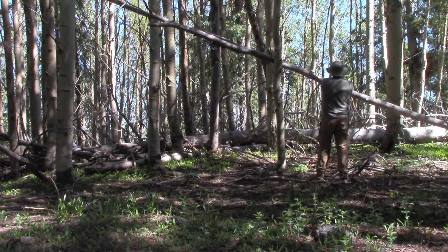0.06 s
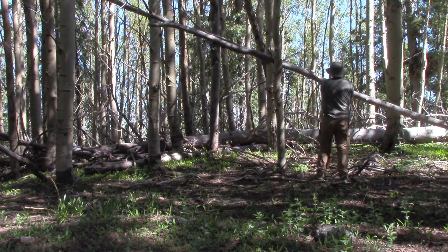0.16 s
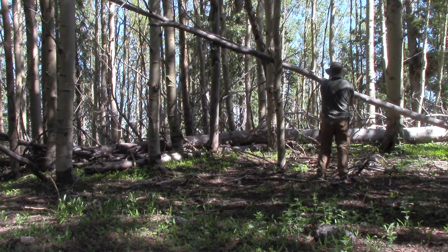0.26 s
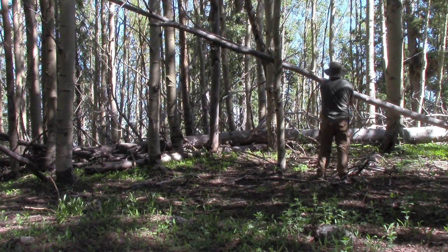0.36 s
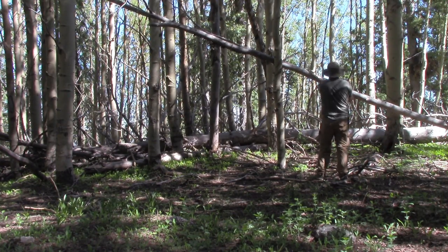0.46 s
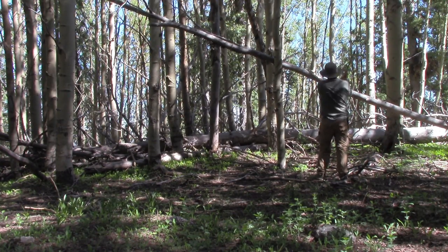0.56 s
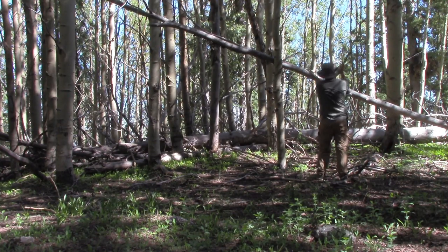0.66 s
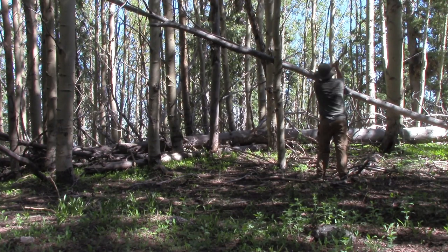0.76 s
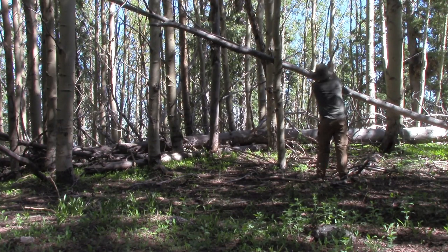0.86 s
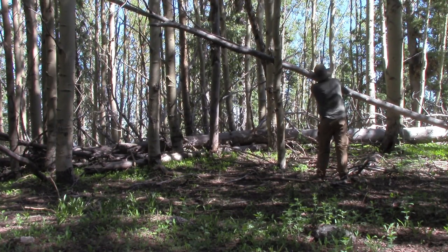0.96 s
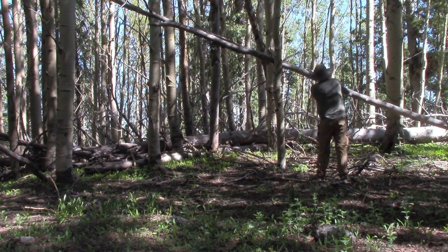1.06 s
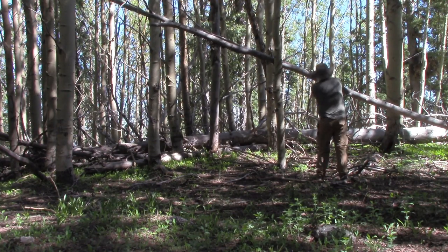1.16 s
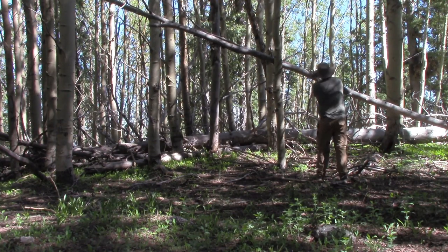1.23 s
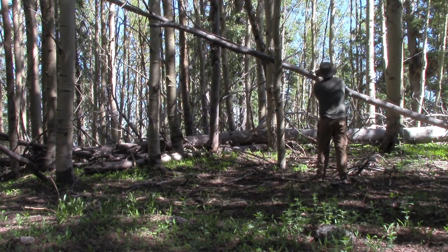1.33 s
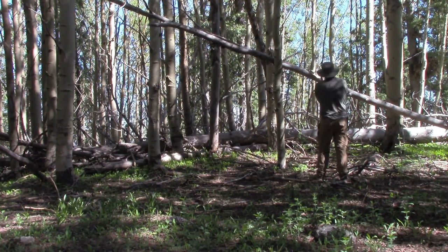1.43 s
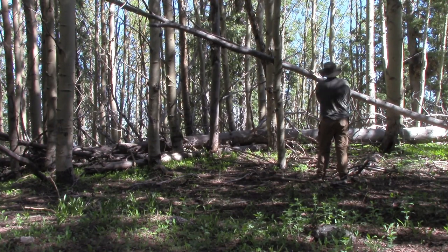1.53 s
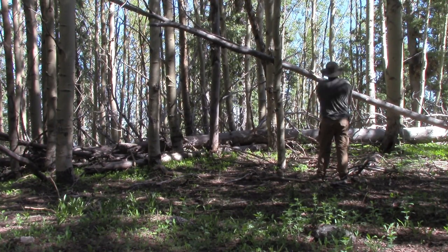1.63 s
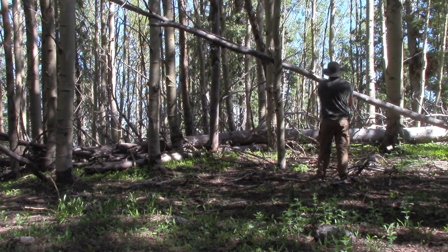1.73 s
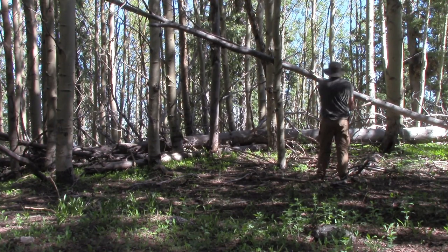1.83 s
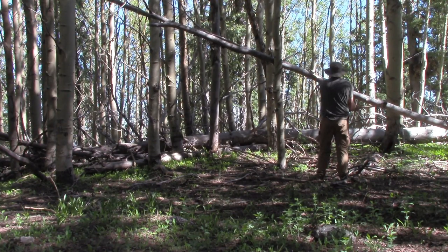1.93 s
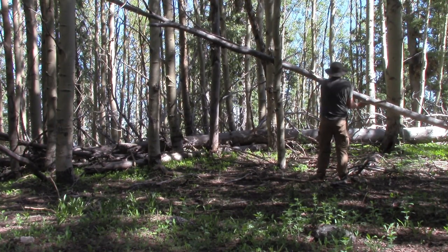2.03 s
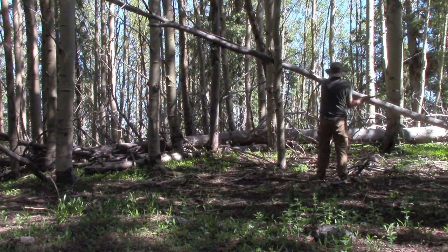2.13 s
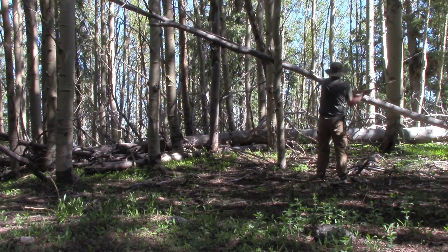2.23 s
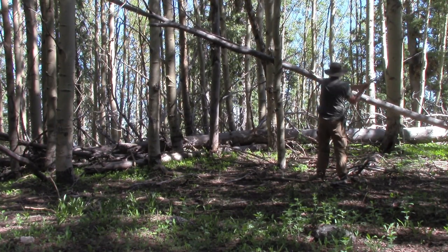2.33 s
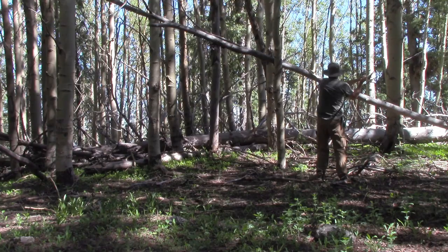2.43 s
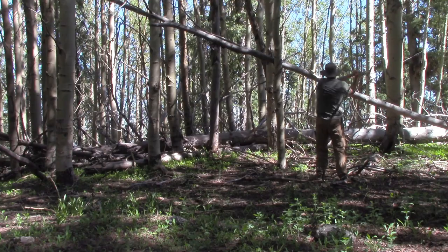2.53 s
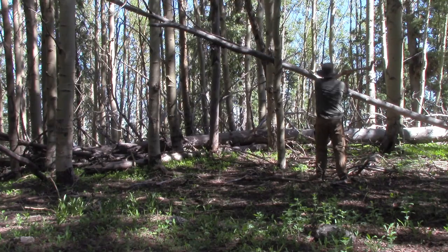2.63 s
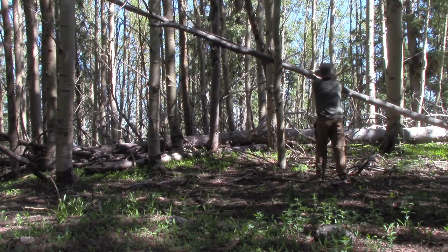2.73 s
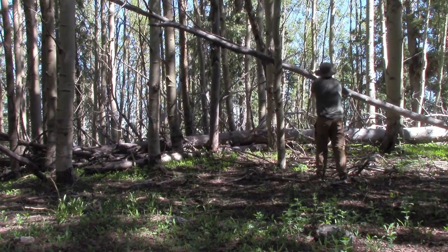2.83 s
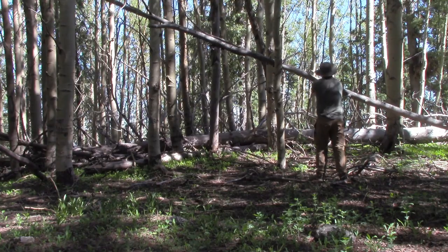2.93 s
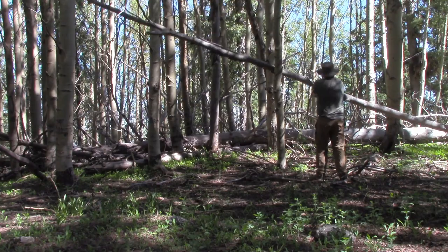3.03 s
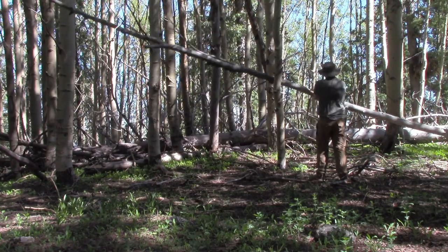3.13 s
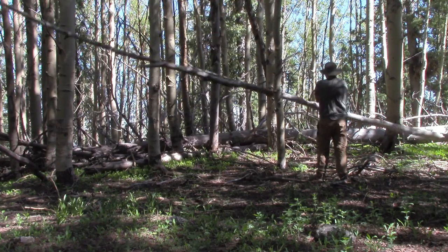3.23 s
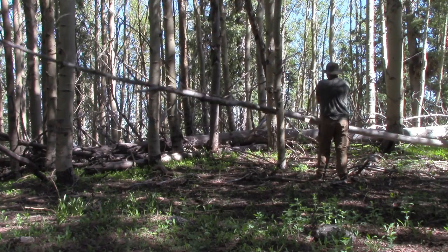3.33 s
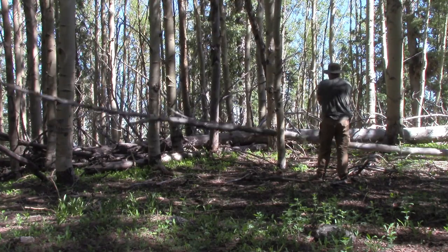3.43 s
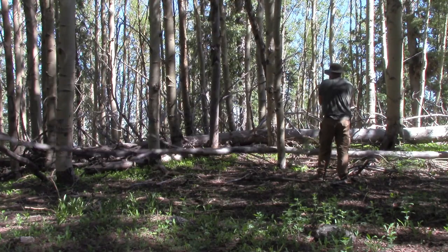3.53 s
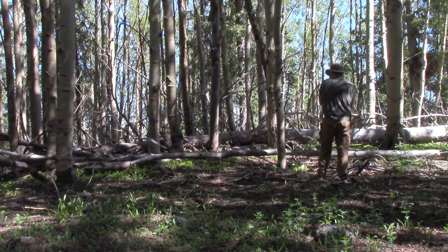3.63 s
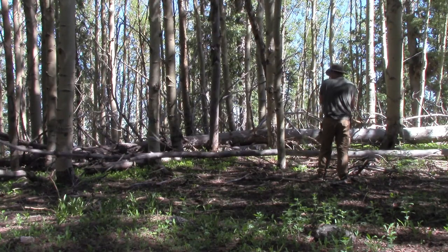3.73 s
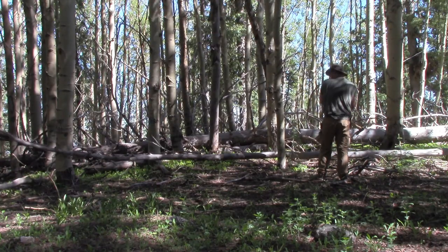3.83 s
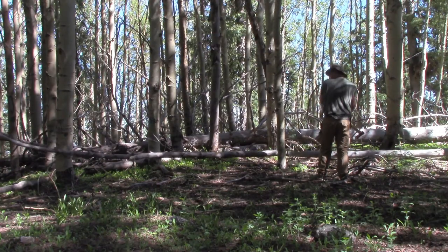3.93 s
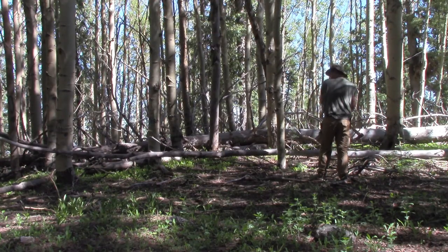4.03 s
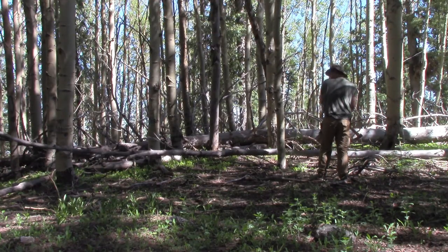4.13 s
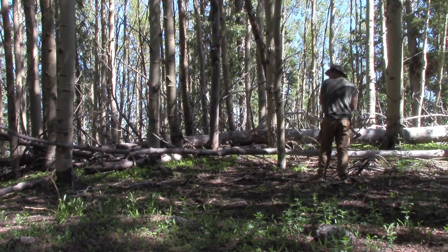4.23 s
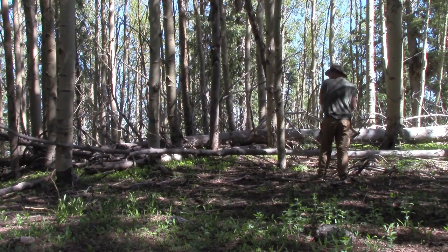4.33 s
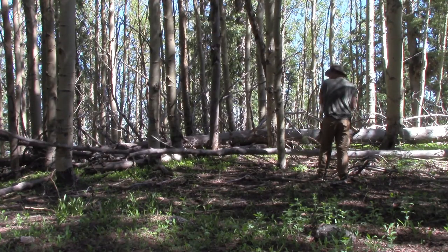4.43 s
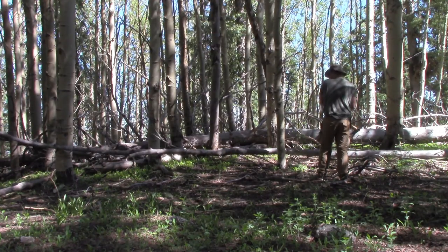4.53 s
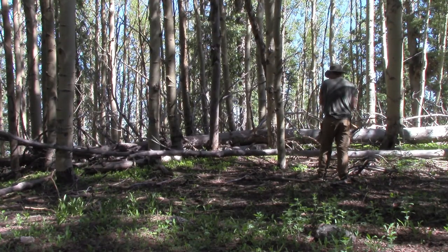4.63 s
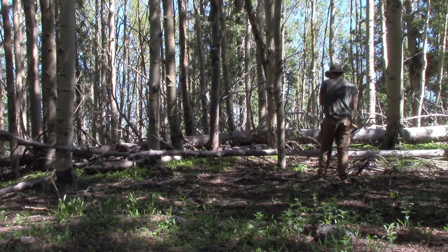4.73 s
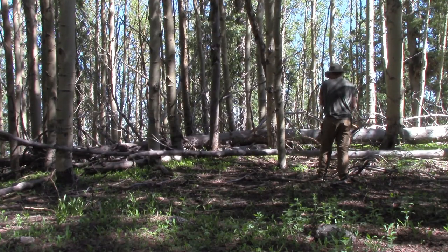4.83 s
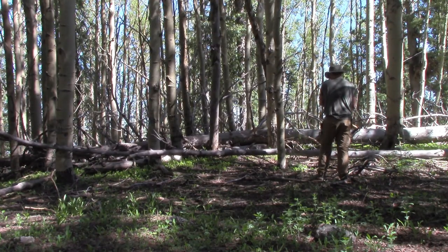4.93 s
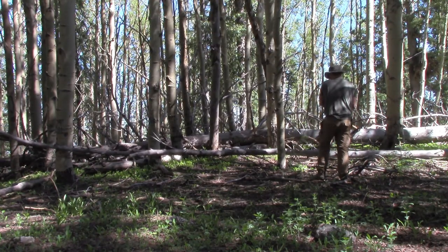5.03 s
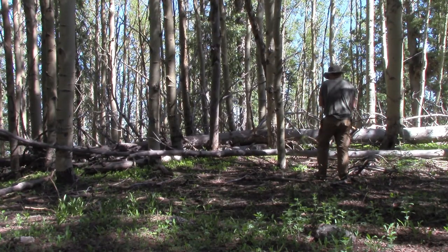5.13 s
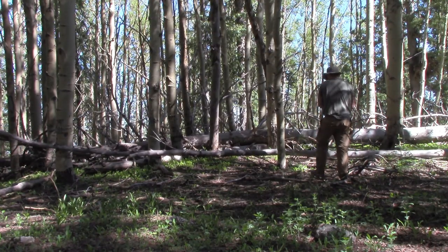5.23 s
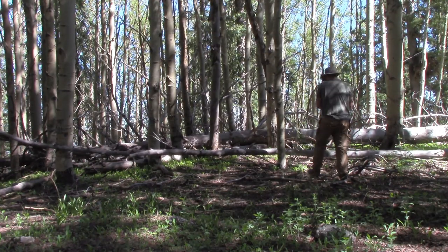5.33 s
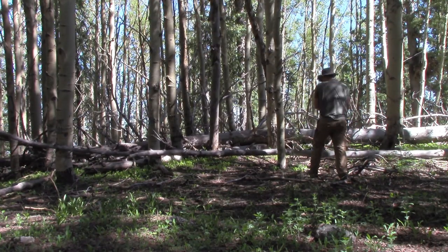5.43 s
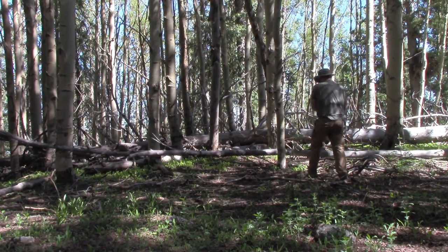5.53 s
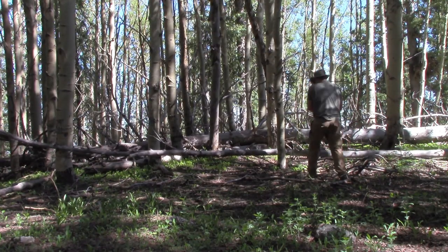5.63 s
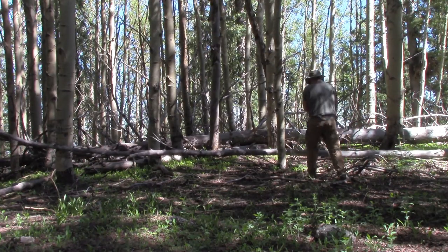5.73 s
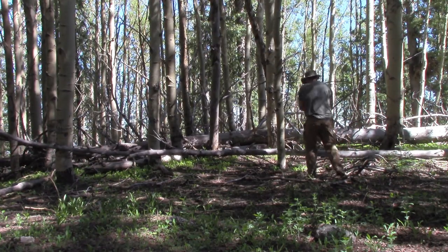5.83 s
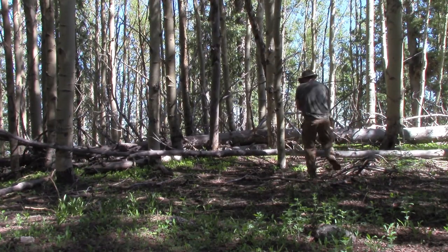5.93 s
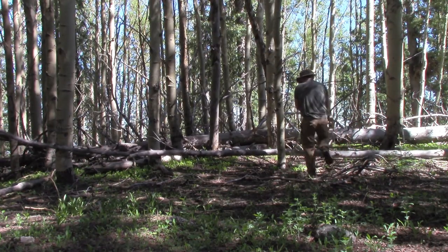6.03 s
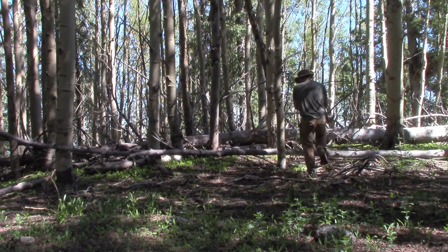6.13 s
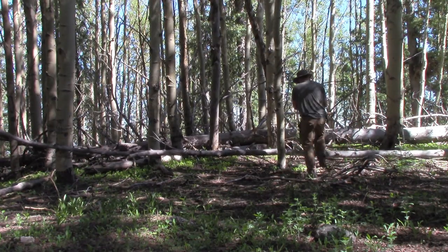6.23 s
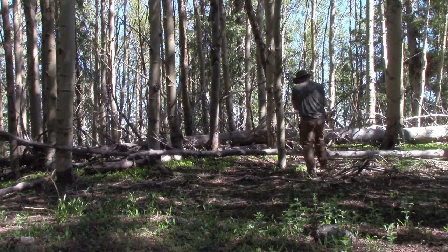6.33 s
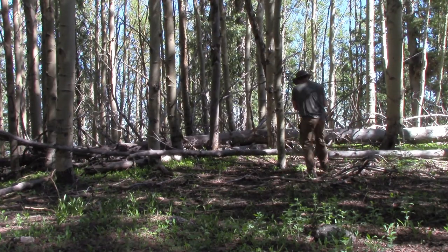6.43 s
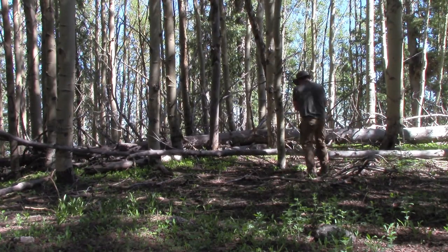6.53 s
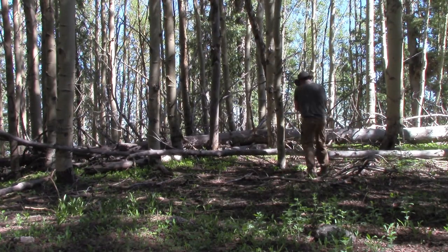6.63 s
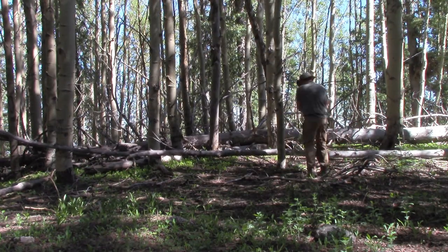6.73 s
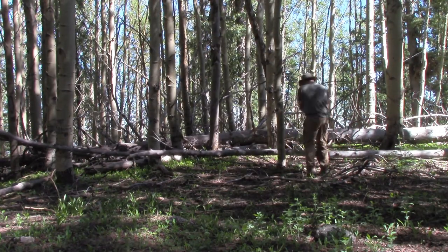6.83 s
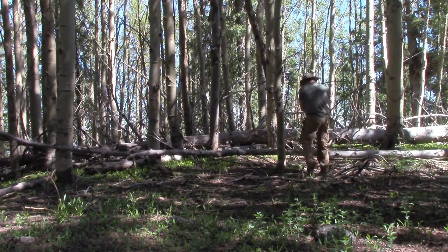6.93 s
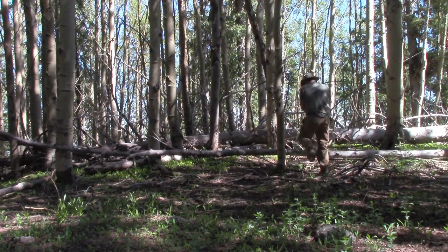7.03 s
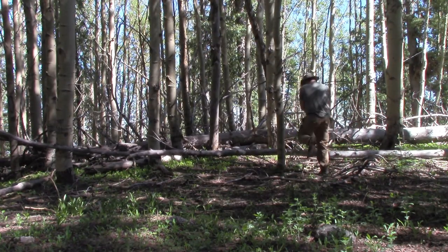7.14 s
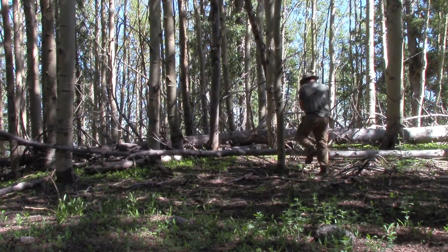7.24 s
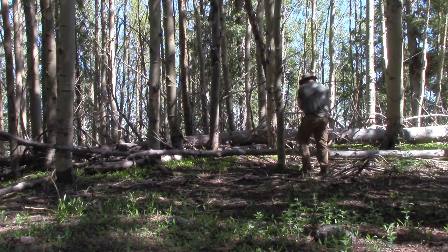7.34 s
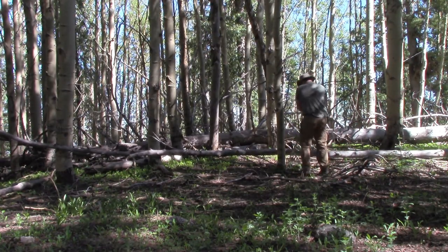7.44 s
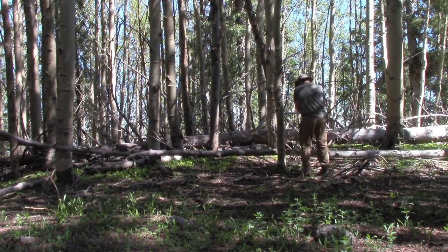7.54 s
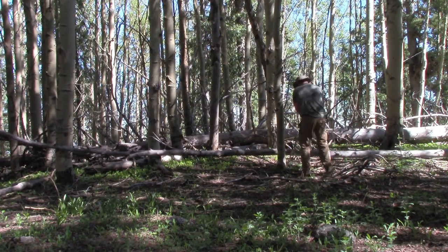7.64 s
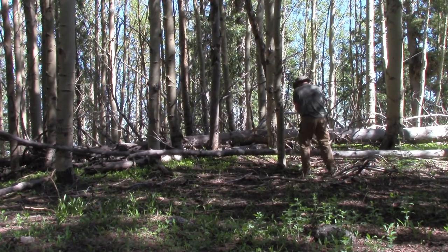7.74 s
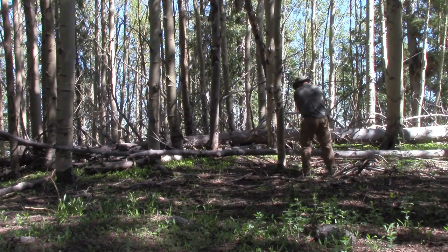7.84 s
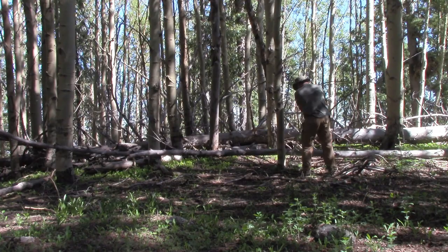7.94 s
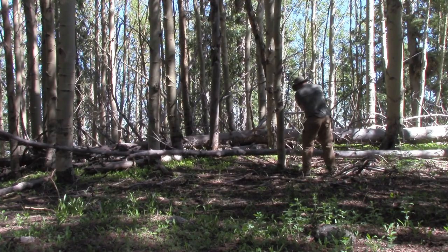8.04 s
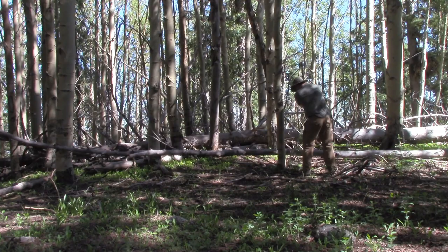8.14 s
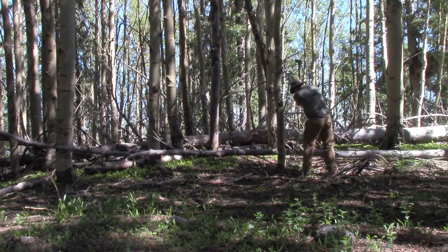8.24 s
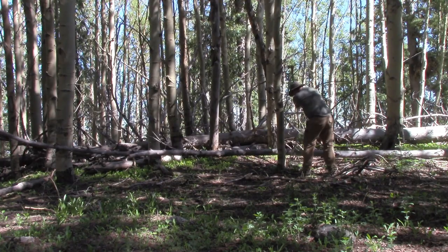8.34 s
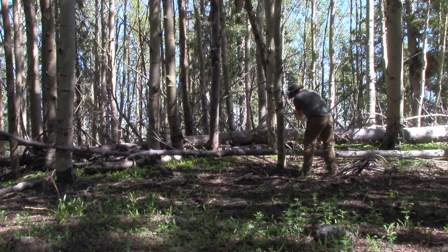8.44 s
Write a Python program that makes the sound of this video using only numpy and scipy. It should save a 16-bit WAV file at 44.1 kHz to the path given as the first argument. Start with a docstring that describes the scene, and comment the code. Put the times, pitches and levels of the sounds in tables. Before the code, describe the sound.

In a forest with a faint breeze and ticking twigs, an axe strikes a dead leaning tree twice, each blow a woody crack with a short echo. After the second, the tree crashes through dry branches that snap and splinter, and thumps onto the ground. Debris patters down, then boots shuffle softly over leaf litter and break a few sticks. A faint bird trills at the end. Everything is heard from several metres away.

```python
"""A forest in a light breeze, twigs ticking. Some metres away an axe strikes a dead leaning tree twice,
splitting fibres and ringing the trunk. The tree gives way and crashes down through dry branches, which
snap and splinter; it thumps onto the ground and needles hiss down after it. Then boots shuffle over leaf
litter and break a few sticks. The standing trunks scatter every blow back; a far bird trills at the end."""
import sys
import numpy as np
from scipy import signal
from scipy.fft import rfft, irfft, next_fast_len
from scipy.io import wavfile
from scipy.ndimage import map_coordinates

SR = 44100
rng = np.random.default_rng(int(sys.argv[2]) if len(sys.argv) > 2 else 0)


def inscribe(sig):
    """Save sig as 16-bit PCM at rate SR to the path in sys.argv[1].

    A 1-D sig is mono; a 2-D sig holds one channel per row.
    Samples are clipped to [-1, 1] before scaling.
    """
    pcm = np.round(np.clip(np.atleast_2d(sig).T, -1, 1) * 32767)
    wavfile.write(sys.argv[1], SR, pcm.astype(np.int16))


N = 373527
T = np.arange(SR // 5) / SR  # time since a hit, s

# Cue levels are faders, ahead of each layer's own trim.
# axe blows: t/s, level/dB, splitting crack/dB, sub-bass pulse/dB
AXE_BLOWS = [(1.0328, -13.5, -4.5, -33), (2.8396, -12, -2.5, -16)]
# twigs ticking: t/s, level/dB, f/Hz
TWIG_TICKS = [(0.124, -26.5, 8400), (0.229, -20, 2600), (0.307, -26.5, 8610), (0.424, -30.5, 7000),
              (0.601, -32, 8160), (0.687, -21.5, 8000), (1.6046, -27, 3080), (1.832, -25.5, 1640),
              (2.15, -33, 2880), (4.782, -16.5, 2760), (4.9313, -22.5, 2080), (4.9581, -19.5, 2930),
              (5.236, -23.5, 2600), (5.7195, -27.5, 2000), (6.058, -31, 6400), (6.609, -28.5, 3040),
              (7.133, -26.5, 6800), (7.268, -32.5, 3000), (7.3634, -36, 8550), (7.7137, -25.5, 8340)]
# boots pressing into leaf litter: t/s of the peak, level/dB, half length/s
BOOT_SHUFFLES = [(0.498, -68.5, 0.252), (5.05, -66, 0.31), (5.496, -54.5, 0.13), (5.786, -49, 0.11),
                 (6.667, -53, 0.1), (6.935, -49, 0.054), (7.387, -40.5, 0.015), (7.692, -49.5, 0.17)]
# heavy wood and boots meeting the ground or a support: t/s, level/dB, sub-bass pulse/dB, f/Hz
GROUND_THUDS = [(3.303, -44, 2, 310), (3.562, -21.5, -11.5, 363), (3.697, -23, -41.5, 304),
                (3.885, -22, -35, 302), (3.947, -39, -10, 317), (4.34, -28.5, -17, 377),
                (4.379, -20.5, -39, 379), (4.418, -22, -38, 503), (4.571, -37.5, -30, 357),
                (4.708, -28.5, -42, 540), (5.82, -34.5, -33, 530), (5.826, -40, -32, 305),
                (7.372, -44, -22, 345), (7.525, -50, -33, 334), (7.56, -49.5, -33, 320),
                (7.812, -45, -25, 331)]
# bark and chips landing after the blows: t/s, level/dB
CHIP_FALLS = [(1.146, -35), (1.287, -42), (1.4423, -49.5), (1.522, -49), (1.6831, -43), (3.062, -35.5),
              (3.141, -39.5), (3.157, -32.5)]
# dry branches breaking: t/s, level/dB, f/Hz
BRANCH_SNAPS = [(2.9528, -12, 4360), (3.1789, -18.5, 3860), (3.26, -11.5, 2720), (3.2709, -4, 4730),
                (3.2964, -7.5, 3660), (3.3064, -1, 4800), (3.3517, -1, 4860), (3.4948, -12.5, 3490),
                (3.532, -16.5, 3290), (3.5827, -5.5, 1150), (3.6082, -7.5, 1490), (3.6503, -2.5, 1260),
                (3.6682, -6, 8400), (3.713, -4.5, 2560), (3.7676, -10.5, 8100), (3.7805, -2.5, 2970),
                (3.8151, -10.5, 8200), (3.837, -6, 8400), (3.881, -10.5, 1650), (3.928, -1, 5150),
                (3.942, 0, 3580), (3.9497, -4, 3100), (4.005, -9, 3680), (4.0227, -21.5, 7850),
                (4.0324, -9, 7750), (4.1312, -19, 1460), (4.2245, -9.5, 1520), (4.322, -8.5, 6200),
                (4.3413, -4, 4200), (4.3783, -3, 2900), (4.4166, -13, 1200), (4.571, -15, 2920),
                (4.7073, -13, 1370), (4.7136, -8.5, 1950), (5.758, -17, 2800), (5.819, -18, 1730)]
# the falling tree ploughing into branches: t/s, hold/s, tumbling limbs/dB, splinters/dB
CROWN_CRASHES = [(3.13, 0.22, -44, -44.5), (3.251, 0.27, -35.5, -36), (3.489, 0.052, -35, -24.5),
                 (3.563, 0.1, -20.5, -20), (3.679, 0.25, -33.5, -34), (3.928, 0.09, -31.5, -28.5),
                 (4.327, 0.085, -28.5, -32), (4.714, 0.041, -46, -37.5)]
# fader ride of the breeze: t/s, level/dB
BREEZE_RIDE = [(2.599, -57.5), (6.2, -56.5)]
# modes of the struck trunk: f/Hz, level/dB, t60/s
TRUNK_MODES = [(335.6, -6.5, 0.085), (591, 1.5, 0.046), (675, 4, 0.11), (885, 12, 0.041),
               (1012, 10.5, 0.051)]
# decay of the forest reverb: f/Hz, t60/s
FOREST_DECAY = [(150, 0.9), (800, 1.08), (3000, 0.95), (13000, 0.91)]

# EQ curves: f/Hz, level/dB
BREEZE_EQ = [(25, -10), (160, -13.5), (260, -5), (450, -3), (950, -4.5), (2000, -13), (4000, -14),
             (10000, -19), (16000, -26.5)]  # air in the treetops
LIMB_EQ = [(100, -25), (200, -9), (300, 0.5), (500, -1.5), (850, 1), (1300, 2.5), (2500, -5.5),
           (5000, -48.5)]  # tumbling limbs
SPLINTER_EQ = [(200, -24.5), (900, -7.5), (3000, 0.5), (4500, -5.5), (6400, -8), (8300, -5.5), (11500, -14),
               (16000, -25.5)]  # dry wood shattering
LITTER_EQ = [(130, -23.5), (305, 5), (600, -1.5), (1450, -2.5), (4550, -3), (8400, 3), (11500, -5),
             (16000, -11)]  # dry leaves and needles
CRACK_EQ = [(100, -26), (500, 2), (1000, -0.5), (1500, -2.5), (2800, -1), (4200, -9), (6300, -13.5),
            (8000, -8.5), (16000, -27.5)]  # tearing fibres
KNOCK_EQ = [(100, -35), (280, -3), (550, -1.5), (1000, 1), (2000, -10.5), (6000, -58)]  # a limb recoiling
THUMP_EQ = [(80, -30), (160, -19), (240, -5.5), (310, -1.5), (420, -6.5), (2500, -52)]  # heavy wood on soft ground, pitched at THUMP_HZ
CHIP_EQ = [(300, -22.5), (1200, 0), (3000, 0), (5000, -4.5), (7500, -22), (16000, -28.5)]  # falling bark
SCATTER_EQ = [(90, -11.5), (300, 2), (850, 0.5), (1500, 1), (4000, 4), (12000, -6)]  # what the standing trunks throw back
SIDE_EQ = [(150, -8.5), (1000, -6), (4000, -5.5), (8000, -9), (13000, -17.5)]  # side against mid in scattered sound

THUMP_HZ = 292


def amp(db):
    """Decibels to gain."""
    return 10 ** (np.asarray(db) / 20)


def unit(x):
    """Scale to rms 1."""
    return x / np.sqrt(np.mean(x ** 2) + 1e-20)


def curve(points):
    """A function of frequency through (f, value) points, on a log axis."""
    freqs, values = np.transpose(points)
    return lambda hz: np.interp(np.log(hz + 1), np.log(freqs + 1), values)


def stick(base_eq, pitch_hz, lift_db, octaves):
    """The tone of a breaking stick: a bell boost at its own pitch on top of a base EQ."""
    return lambda hz: base_eq(hz) + lift_db * np.exp(-(np.log2((hz + 1) / pitch_hz) / octaves) ** 2)


def colour(x, eq):
    """Minimum-phase filter; eq gives dB for each frequency."""
    size = 2 ** 12
    cepstrum = irfft(np.log(amp(eq(np.fft.rfftfreq(size, 1 / SR))) + 1e-6))
    cepstrum[1:size // 2] *= 2
    cepstrum[size // 2 + 1:] = 0
    impulse = irfft(np.exp(rfft(cepstrum)))[:size // 2]
    return signal.oaconvolve(x, impulse)[:len(x)]


def add(track, s, sound):
    """Lay a sound into a track at s seconds."""
    i = max(round(s * SR), 0)
    track[i:i + len(sound)] += sound[:N - i]


def fade(t60):
    """Decay after a hit: 60 dB down in t60 seconds."""
    return np.exp(-np.log(1000) * T / t60)


def swell(start, hold, release_s, attack_s=0.0014):
    """The envelope of a crash: quick attack, hold, exponential release."""
    age = np.maximum(np.arange(N) / SR - start, 0)
    return (1 - np.exp(-age / attack_s)) * np.exp(-np.maximum(age - hold, 0) / release_s)


def wobble(rate):
    """A smooth random curve, rate knots a second."""
    return map_coordinates(rng.standard_normal(int(N * rate / SR) + 4), [np.arange(N) * rate / SR])


def widen(mid, side):
    """Mid and side to left and right, for sound that arrives from all around."""
    side = colour(side, curve(SIDE_EQ))
    return np.array([mid + side, mid - side])


def burst(eq, t60, grit_db, rise=0.000594):
    """A quickly swelling, then dying cluster of tiny fractures; rms 1 over its first 10 ms."""
    noise = rng.standard_normal(len(T))
    grit = amp(grit_db * np.repeat(rng.standard_normal(len(T)), 16)[:len(T)])
    attack = 1 - np.exp(-(T / rise) ** 2)
    hit = colour(noise * grit * fade(t60) * attack, eq)
    return hit / np.sqrt(np.mean(hit[:SR // 100] ** 2))


def crackle(eq, rate, size_db, life_s):
    """Little fractures of uneven size, rate a second, each a dying puff of noise; rms 1."""
    sizes = amp(size_db * np.minimum(rng.exponential(size=N), 3))
    onsets = rng.random(N) < rate / SR
    power = signal.lfilter([1], [1, -np.exp(-2 / (life_s * SR))], (sizes * onsets) ** 2)
    return unit(colour(np.sqrt(power) * rng.standard_normal(N), eq))


def fractures(eq, rate, size_db, life_s, count):
    """Crackle from count sticks of different thickness, each with a pitch of its own; rms 1."""
    out = np.zeros(N)
    for pitch_hz in np.geomspace(400, 9000, count):
        wood = stick(lambda hz: eq(hz) - 20, pitch_hz, lift_db=17, octaves=1.28)
        out += amp(eq(pitch_hz)) * np.sqrt(pitch_hz) * crackle(wood, rate / count, size_db, life_s)
    return unit(out)


def breeze():
    """Air in the far treetops: a wide, gently wavering bed that comes up slightly."""
    air = [colour(noise, curve(BREEZE_EQ)) for noise in rng.standard_normal((2, N))]
    level_db = np.interp(np.arange(N) / SR, *np.transpose(BREEZE_RIDE))
    return unit(widen(*air)) * amp(level_db + 0.4 * wobble(6.8))


def crown(stir_s=0.5):
    """The crown shakes faintly and comes to rest; in the fall, limbs tumble and dead twigs shatter."""
    stir = np.exp(-np.arange(N) / SR / stir_s)
    limb_power, splinter_power = (amp(-56.5) * stir) ** 2, (amp(-57) * stir) ** 2
    for s, hold, limbs_db, splinters_db in CROWN_CRASHES:
        settling = amp(-20) * swell(s, hold, release_s=0.35)  # loose wood keeps falling
        crash = np.hypot(swell(s, hold, release_s=0.0156), settling)
        limb_power += (amp(limbs_db) * crash) ** 2
        splinter_power += (amp(splinters_db) * crash) ** 2
    tumble = fractures(curve(LIMB_EQ), rate=900, size_db=2.5, life_s=0.0037, count=8)
    shatter = fractures(curve(SPLINTER_EQ), rate=700, size_db=5, life_s=0.0012, count=6)
    return np.sqrt(limb_power) * tumble + np.sqrt(splinter_power) * shatter


def twigs():
    """Thin twigs and flying chips give one short, bright tick each."""
    out = np.zeros(N)
    for s, db, pitch_hz in TWIG_TICKS:
        twig = stick(curve(LITTER_EQ), pitch_hz, lift_db=8.5, octaves=1)
        add(out, s, amp(db - 18.5) * burst(twig, t60=0.035, grit_db=4))
    return out


def boots():
    """Dry leaves and needles crunch under shifting weight."""
    t = np.arange(N) / SR
    weight = sum(amp(db) / (1 + np.abs((t - s) / half) ** 3) for s, db, half in BOOT_SHUFFLES)
    return weight * crackle(curve(LITTER_EQ), rate=1000, size_db=4.4, life_s=0.0008)


def trunk(pitch_ratio):
    """The struck trunk rings in a few short, woody modes with a softened attack."""
    ring = sum(amp(db) * fade(t60) * np.sin(2 * np.pi * (hz * pitch_ratio * T + rng.random()))
               for hz, db, t60 in TRUNK_MODES)
    return ring * (1 - np.exp(-(T / 0.0032) ** 2))


def axe():
    """The blade splits fibres and rings the trunk; the notch knocks and tears on."""
    out = np.zeros(N)
    notch = stick(curve(KNOCK_EQ), pitch_hz=780, lift_db=13.5, octaves=0.52)
    for s, db, crack_db, _ in AXE_BLOWS:
        body = burst(notch, t60=0.16, grit_db=5, rise=0.0011)
        bite = burst(curve(CRACK_EQ), t60=0.045, grit_db=3, rise=0.0014)
        tear = burst(curve(CRACK_EQ), t60=0.4, grit_db=4, rise=0.0038)
        crack = amp(crack_db) * (bite + amp(-12.5) * tear)
        add(out, s, amp(db) * (amp(-8) * trunk(pitch_ratio=1) + amp(-7.5) * body + crack))
    return out


def thuds(sub_s=0.0016):
    """Heavy contacts: a hollow thump at the pitch of the limb, with a short sub-bass pulse under the hit."""
    out = np.zeros(N)
    sub = -(T / sub_s) ** 2 * np.exp(-T / sub_s)
    # the trunk bumps its support just after each axe blow
    bumps = [(s + 0.018, db - 12, sub_db, THUMP_HZ) for s, db, _, sub_db in AXE_BLOWS]
    for s, db, sub_db, pitch_hz in bumps + GROUND_THUDS:
        thump = burst(lambda hz: curve(THUMP_EQ)(hz * THUMP_HZ / pitch_hz), t60=0.06, grit_db=2)
        hollow = fade(0.0594) * np.sin(2 * np.pi * pitch_hz * T) * (1 - np.exp(-pitch_hz * T))
        add(out, s, amp(db - 19) * (unit(thump) + amp(-2.5) * unit(hollow) + amp(sub_db) * unit(sub)))
    return out


def chips():
    """Bark and chips shaken loose by the axe land with a dull little crunch."""
    out = np.zeros(N)
    for s, db in CHIP_FALLS:
        add(out, s, amp(db) * burst(curve(CHIP_EQ), t60=0.0512, grit_db=0, rise=0.003))
    return out


def branches(split_gap_s=0.0085):
    """Each branch gives a dry crack around its own pitch, its fibres tear, and the limb behind knocks."""
    out = np.zeros(N)
    for s, db, pitch_hz in BRANCH_SNAPS:
        wood = stick(curve(SPLINTER_EQ), pitch_hz, lift_db=8.5, octaves=0.49)
        rise = 2.5 / pitch_hz  # thick, low branches give way more slowly
        crack = amp(-14.5) * burst(wood, t60=0.019, grit_db=4.5, rise=rise)
        tear = amp(-24.5) * burst(wood, t60=0.069, grit_db=-2.5)
        knock_db = -16.5 - 8 * np.log2(pitch_hz / 1000)  # thin, high ones knock less
        knock = amp(knock_db) * burst(curve(KNOCK_EQ), t60=0.047, grit_db=-1)
        add(out, s, amp(db) * (crack + tear + knock))
        split_s = s + split_gap_s * rng.uniform(0.6, 1.3)  # the last fibres part a little later
        add(out, split_s, amp(db - 25.5) * burst(wood, t60=0.024, grit_db=5.5))
    return out


def needles():
    """Every crash shakes out dry needles and flakes of bark, which hiss down onto the litter."""
    power = sum((amp(db) * swell(s, hold, release_s=0.91)) ** 2 for s, hold, _, db in CROWN_CRASHES)
    patter = crackle(curve(LITTER_EQ), rate=240, size_db=3, life_s=0.00123)
    return amp(-24.5) * np.sqrt(power) * patter


def landing(at_s=3.5618):
    """The trunk strikes the ground and rings a little higher than under the axe."""
    out = np.zeros(N)
    ring = amp(-4) * trunk(pitch_ratio=1.2)
    impact = burst(curve(LIMB_EQ), t60=0.048, grit_db=1)
    add(out, at_s, amp(-14) * (ring + impact))
    return out


def bird(start_s=7.99, notes_per_s=23, top_hz=11400, fall_hz=2100):
    """A far bird starts a thin, buzzy, very high trill of falling notes."""
    t = np.arange(N) / SR - start_s
    note_progress = t * notes_per_s % 1
    phase = 2 * np.pi * np.cumsum(top_hz - fall_hz * note_progress) / SR
    pulses = (t > 0) * np.sin(np.pi * note_progress) ** 2
    buzz = wobble(700)
    return amp(-63) * pulses * buzz * np.sin(phase)


def forest(near_db, far_db):
    """Impulse response of one spot: ground and close trunks answer at once, the deep wood trails on."""
    grain = amp(4.5 * np.repeat(rng.standard_normal((2, SR // 150)), 150, axis=1))
    hz, t, spectrum = signal.stft(rng.standard_normal((2, SR)) * grain, SR, nperseg=256)
    scatter = amp(curve(SCATTER_EQ)(hz))[:, None]
    decay = np.exp(-np.log(1000) * t / curve(FOREST_DECAY)(hz)[:, None])
    tail = signal.istft(spectrum * scatter * decay, SR, nperseg=256)[1]
    tail *= 1 - np.exp(-np.arange(tail.shape[1]) / SR / 0.016)  # the tail blooms
    early = rng.standard_normal((2, len(T))) * (rng.random((2, len(T))) < 0.03)
    early *= fade(0.25) * (T > 0.002)
    paths = amp(far_db) * tail / np.linalg.norm(tail[0])
    paths[:, :len(T)] += amp(near_db) * early / np.linalg.norm(early[0])
    return widen(*paths)


def echoes(send, near_db, far_db, spots, step_s=0.05):
    """The send crossfades round several spots, so successive sounds get different echoes."""
    position = np.arange(N) / SR / step_s
    out = np.zeros((2, N))
    for k in range(spots):
        share = np.sqrt(np.clip(1 - np.abs((position - k) % spots - 1), 0, 1))
        out += signal.oaconvolve((send * share)[None], forest(near_db, far_db), axes=1)[:, :N]
    return out


def scene():
    """The action sits near centre among the trees, thuds a little left; the snaps are mixed drier."""
    blows, low, snaps = axe(), thuds(), branches() + twigs()
    debris = landing() + crown() + needles() + chips() + boots() + bird()
    direct = blows * amp([[0.4], [-0.4]]) + snaps + debris + low * amp([[1.8], [-1.8]])
    fall_send = debris + low + amp(-5.5) * snaps
    axe_echoes = echoes(blows, near_db=-8, far_db=-11.5, spots=2)
    fall_echoes = echoes(fall_send, near_db=-1.5, far_db=-12, spots=5)
    return direct + axe_echoes + fall_echoes + breeze()


def record(dry, ceiling=0.95, top_hz=16100):
    """Master chain: a soft clip rounds the highest peaks, then a steep low-pass trims the top."""
    clipped = dry / (1 + np.abs(dry / ceiling) ** 6) ** (1 / 6)
    size = next_fast_len(N + SR // 2)
    low_pass = 1 / (1 + (np.fft.rfftfreq(size, 1 / SR) / top_hz) ** 160)
    return irfft(rfft(clipped, size) * low_pass, size)[:, :N]


dry = scene()
out = record(dry)
inscribe(out)
```